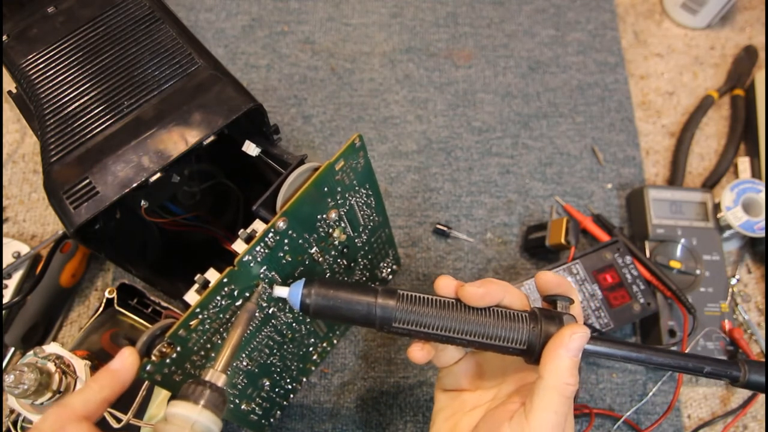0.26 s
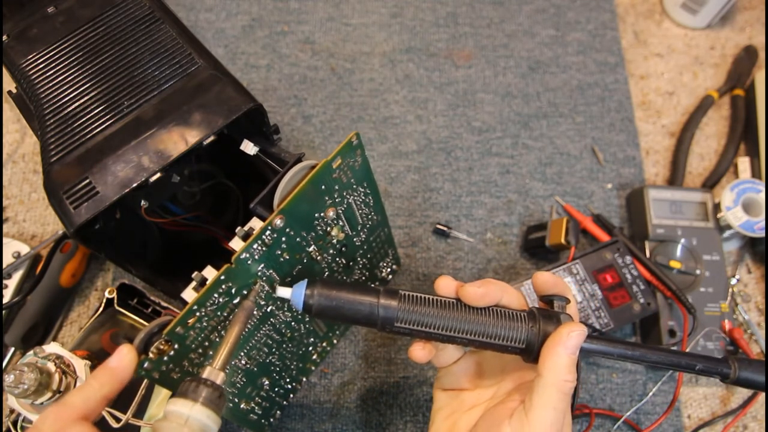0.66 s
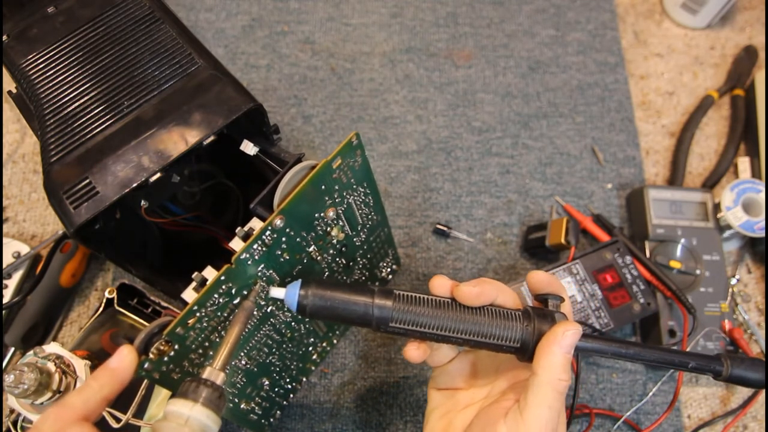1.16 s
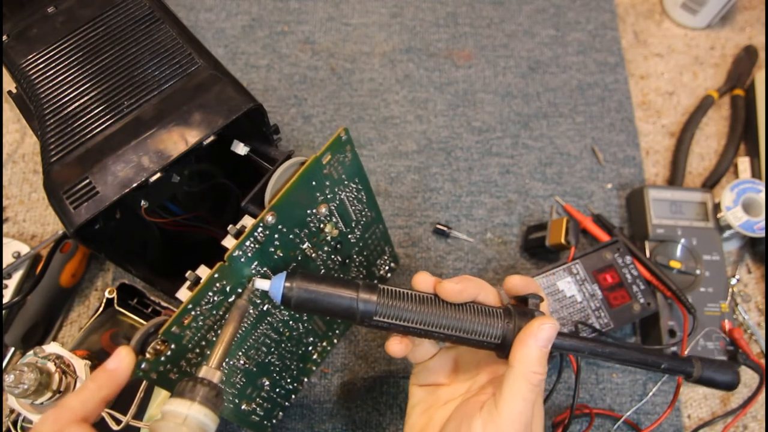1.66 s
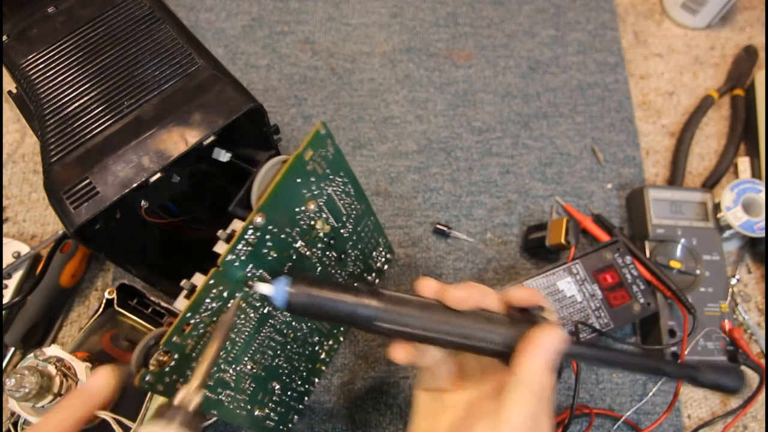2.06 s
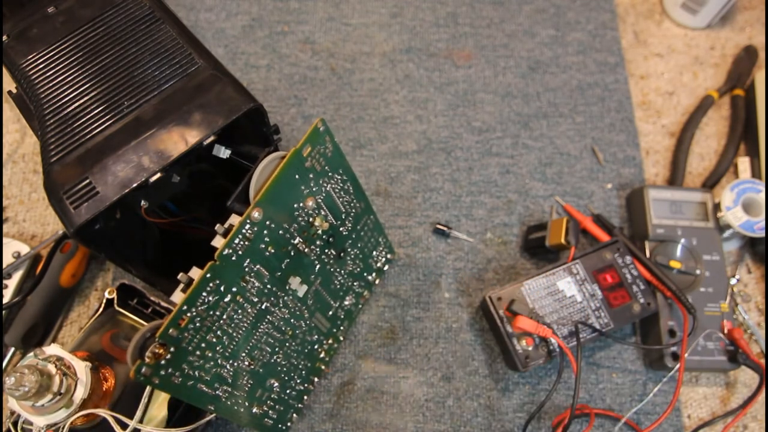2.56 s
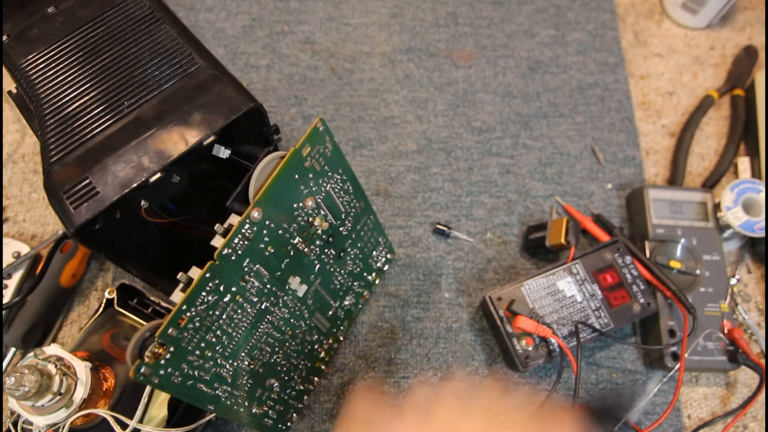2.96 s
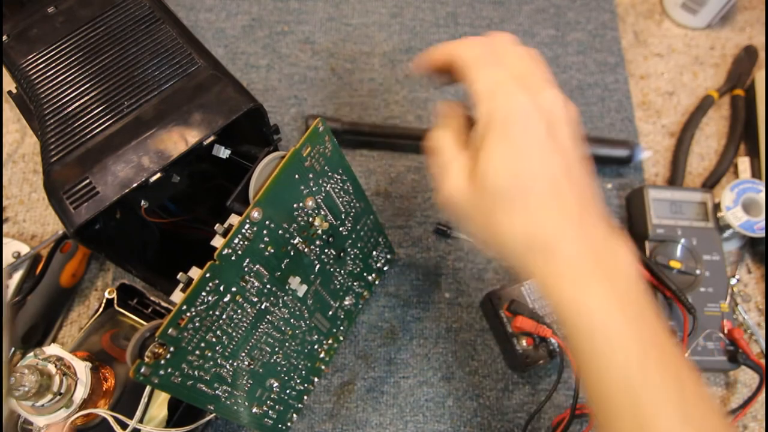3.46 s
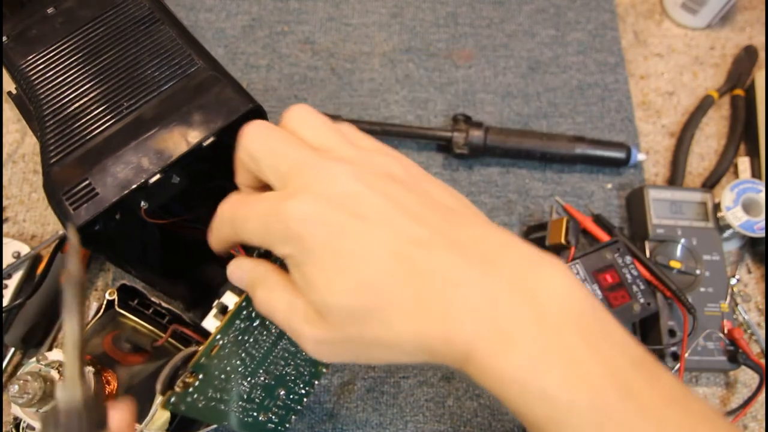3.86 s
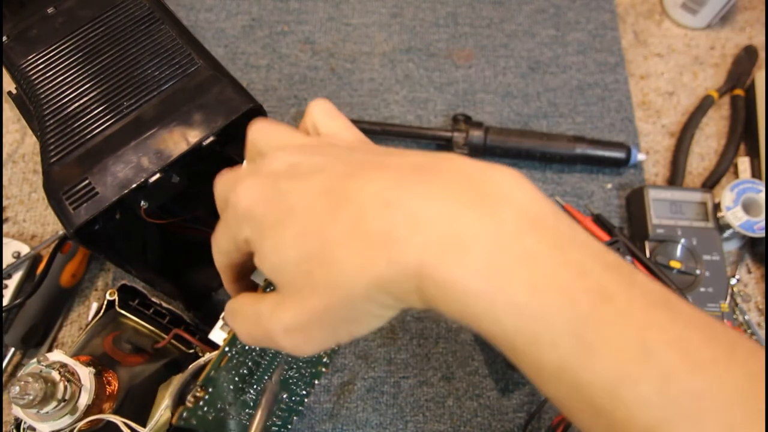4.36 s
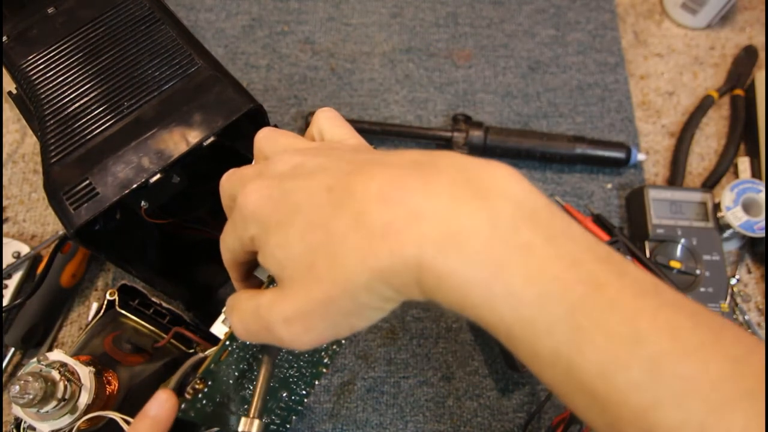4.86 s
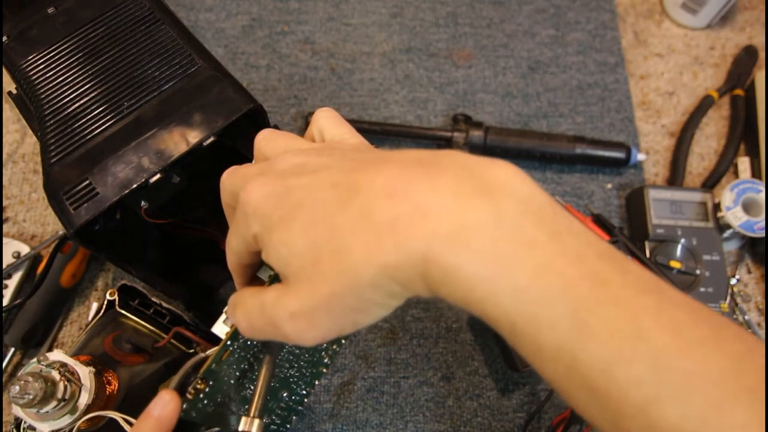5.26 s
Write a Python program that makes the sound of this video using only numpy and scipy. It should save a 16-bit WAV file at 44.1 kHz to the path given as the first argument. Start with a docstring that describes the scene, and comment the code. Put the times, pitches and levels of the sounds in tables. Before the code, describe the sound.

In a small, fairly dry room with steady low room tone and faint hiss, a solder sucker puffs air, snaps sharply, then is cocked with several loud clacks. It is laid down with a dull double thud on a carpeted bench; fingers rap plastic, scuff a circuit board and make it rattle lightly. Close microphone, nearly mono.

```python
"""A solder sucker works on a circuit board in a small room, over steady room tone and microphone hiss.
First come air puffs, as shaped turbulent noise with faint rustle; then the plunger snaps and is cocked again, as
pings, noise bursts and damped notes. The tool is laid on a carpeted bench: soft forces excite its modes and it sways.
Fingers scuff an edge and rap a hollow case; small metal parts chink as narrow noise bands. A hand grips the
board, whose modes rattle under uneven rubbing; faint chinks come last. A diffuse tail follows every close sound."""
import sys
import numpy as np
from scipy import signal
from scipy.fft import rfft, irfft
from scipy.io import wavfile

SR = 44100
rng = np.random.default_rng(int(sys.argv[2]) if len(sys.argv) > 2 else 0)


def generate_wav(sig):
    """Save sig (samples, or channels by samples) to the path in sys.argv[1] as 16-bit PCM at SR."""
    pcm = np.round(np.clip(np.atleast_2d(sig).T, -1, 1) * 32767).astype(np.int16)
    wavfile.write(sys.argv[1], SR, pcm)


N = 243162

# Spectrum of room tone and microphone hiss: [f/Hz, relative density level/dB]
HUSH_SPECTRUM = [(12, -49), (20, -8), (92, -0.5), (199, -3), (223, -2), (555, -11.5), (656, -12),
                 (753, -14.5), (1730, -18.5), (2770, -20.5), (3180, -23), (15000, -28)]
# Spectrum of the hiss that is opposite in the two channels: [f/Hz, relative density level/dB]
SIDE_SPECTRUM = [(12, -30), (20, -1), (80, -3), (155, -8), (367, -6), (1830, -13), (15000, -8.5)]
HUSH_DB, SIDE_HISS_DB = -46, -62.5   # rms levels
# Reverberation time of the room: [f/Hz, t60/s]
ROOM_DECAY = [(300, 0.46), (2000, 0.36), (5500, 0.28), (14000, 0.26)]
ROOM_DB, CUTOFF_HZ = -11, 15900   # tail level; upper limit of the recorded band

# Faint rustle of sleeves and fingers, a continuous level curve: [t/s, level/dB]
RUSTLE_CURVE = [(1.1, -61.5), (1.9, -54), (2.3, -52.5), (2.66, -54), (2.72, -45), (2.83, -44.5),
                (3.0, -48.5), (3.4, -48.5), (4.3, -51), (4.65, -62.5), (5.5, -57.5)]

# Sway of the bench after hard blows: [t/s, level/dB, t60/s]
BENCH_JOLTS = [(1.9, -39.5, 0.53), (2.85, -47, 0.25), (3.44, -27, 0.22), (3.5, -39.5, 1.9)]
JOLT_RISE_S, SWAY_DB = 0.016, -62.5   # SWAY_DB: the sway that is always present
# The tool meets the bench: [t/s, level/dB, reciprocal of contact time f/Hz]
BENCH_KNOCKS = [(3.364, -24.5, 190), (3.442, -15.5, 600), (3.45, -5.5, 534), (3.463, -16, 251),
                (3.491, -20, 259), (3.552, -32, 500), (3.563, -8, 174), (3.595, -20, 197),
                (3.644, -12, 109), (3.675, -26, 152)]
# Modes of the bench top: [f/Hz, relative level/dB, t60/s]
BENCH_MODES = [(103.4, 8.5, 0.039), (138, 5, 0.072), (200, -11, 0.4), (218, -18, 0.11), (321, 3.5, 0.047),
               (452, -10.5, 0.16), (583, -3, 0.071)]

# Fingers rap a hollow case: [t/s, level/dB]
CASE_RAPS = [(3.722, -18), (3.741, -24)]
# Modes of the case: [f/Hz, relative level/dB, t60/s]
CASE_MODES = [(602, 4.5, 0.049), (750, -6.5, 0.074), (990, -13, 0.028), (1435, -15, 0.071)]

# Fingertips scuff the board's edge: [t/s, level/dB, f/Hz, rise/s, t60/s]
EDGE_SCUFFS = [(3.02, -52, 1290, 0.031, 1.7), (3.64, -43, 1060, 0.026, 0.3), (3.739, -36, 1450, .004, 0.14),
               (3.796, -46.5, 1870, .004, 0.21), (3.995, -43, 990, .002, 0.37),
               (4.095, -42, 1780, 0.011, 0.11), (4.179, -40.5, 1870, .001, 0.43),
               (4.273, -39, 3260, 0.00092, 0.06), (4.464, -36.5, 2260, 0.0018, 0.025),
               (4.852, -36, 1320, 0.0032, 0.11), (4.865, -43, 2320, 0.014, 0.12)]
SCUFF_WIDTH, SCRATCH_DB = 0.44, -2   # width as a share of f; broad scratch relative to the scuff
# Small metal parts are brushed: [t/s, level/dB, t60/s, tilt/dB per octave]
METAL_CHINKS = [(3.558, -27, .1, 4), (3.602, -39, 0.096, 6), (3.66, -52, 0.59, 0), (3.724, -44, 0.089, -11),
                (3.82, -49, 0.49, 0), (3.889, -41, 0.058, -6), (4.042, -47, 0.14, -11),
                (4.078, -29.5, 0.077, -8), (4.179, -47.5, 0.13, -6), (4.234, -36, 0.13, -6),
                (4.274, -43, .05, 11), (4.376, -39.5, 0.18, 12), (4.605, -48, 0.13, -3),
                (5.438, -52, 0.12, 2)]
# Resonances of the metal parts: [f/Hz, width/Hz, relative level/dB]
METAL_BANDS = [(4570, 460, -2.5), (5370, 420, -1.5), (7630, 220, -9.5), (8750, 2700, -8)]
# Rise = CHINK_RISE_S + BRUSH_RISE_PER_S * t60^2: a long brush also rises more slowly
CHINK_SCRATCH_DB, CHINK_RISE_S, BRUSH_RISE_PER_S = -12, 0.0016, 0.055

# The board is gripped, rocked and scraped: [t/s, relative level/dB, t60/s, hardness as tilt/dB per octave]
BOARD_TOUCHES = [(2.137, -48, 0.094, 1.5), (3.82, -46.5, 0.2, -1), (3.868, -28.5, 0.086, 3),
                 (3.878, -36, 0.075, -1), (3.89, -34.5, 0.17, 7.5), (3.9, -46.5, 0.22, -5),
                 (3.997, -44.5, 0.026, -4), (4.083, -47, 0.23, -3.5), (4.18, -54, 0.53, 0),
                 (4.297, -29, 0.11, 0), (4.322, -45, 0.14, -0.5), (4.377, -45, 0.072, 9.5),
                 (4.4, -44.5, 0.051, 6), (4.415, -50.5, 0.14, 9), (4.477, -41, 0.13, 1.5),
                 (4.489, -40, 0.1, -4.5), (4.622, -38, 0.13, 3.2), (4.632, -41, 0.29, 1.2),
                 (4.847, -39.5, 0.18, 5.5), (4.864, -35.5, 0.16, 0.5)]
# Modes of the board: [f/Hz, relative level/dB, t60/s]
BOARD_MODES = [(463, -12, 0.57), (578, -2.5, 0.12), (592.9, -3.5, 0.26), (704, -6.5, 0.053),
               (816, -13, 0.12), (900, -16, 0.033), (1040, -3, 0.035), (1213, -3, 0.15), (1524, 5.5, 0.011),
               (1930, -2, 0.014), (2177, -8, 0.044), (2374, -2, 0.012), (3034, -1.5, 0.0056),
               (3440, -30, .012)]
# Grit relative to the touch (dB), its growth (dB per dB/octave of tilt), rise as a share of t60
GRIT_DB, GRIT_PER_TILT, RISE_SHARE = -2.5, 1.5, 0.043

# Dull single-note thumps of barrel and hand: [t/s, level/dB, f/Hz]
DULL_THUMPS = [(1.904, -22, 214), (1.91, -46, 90), (1.916, -17, 560), (1.923, -18.5, 242),
               (2.029, -28, 464), (2.04, -32, 700), (2.632, -31, 144), (2.655, -17, 584), (2.741, -19, 390),
               (2.841, -25, 350), (2.862, -19.5, 293), (2.862, -15, 1454)]
THUMP_T60_S, THUMP_T60_S_PER_KHZ = 0.016, 0.0083   # higher notes are damped less

# Hard clicks of plastic and metal: [t/s, relative ping level/dB, ping f/Hz, crack level/dB, spit level/dB]
HARD_CLICKS = [(1.527, -40, 5250, -57, -53), (1.902, -11, 5040, -24.5, -17), (1.9052, 3.5, 5870, -8.5, -16),
               (1.9128, -9, 4620, -32, -14), (2.1315, -32, 5460, -37, -37.5), (2.1377, -43, 5740, -48, -47),
               (2.4524, -43, 5230, -49, -41.5), (2.6349, 5, 4690, -16.5, -35), (2.6546, -9, 5070, -15, -36),
               (2.7295, 0.5, 6300, -6.5, -7.5), (2.8534, -14.5, 4700, -38, -42),
               (2.863, -2.5, 6050, -21, -14), (2.9303, -5, 5660, -37, -31), (2.9796, -1.5, 6020, -11, -31),
               (3.1838, -32.5, 5300, -47, -39), (3.4559, -8, 6900, -48, -21),
               (3.5604, -19.5, 5470, -41, -20.5), (3.721, -29.5, 5200, -31, -43),
               (3.8698, -14, 5340, -19, -56), (3.8914, -9.5, 5770, -15.5, -41),
               (4.2961, -19, 3770, -44, -41), (4.3024, -35, 3330, -22, -37), (4.377, -19.5, 2900, -37, -27),
               (4.3984, -25, 3820, -36, -36), (4.4208, -25, 4660, -37, -40)]
CLICK_T60_S, T60_LOSS_S_PER_DB = 0.019, .0005   # t60 at 0 dB; harder clicks are drier
CRACK_HZ, CRACK_HZ_PER_DB = 2550, 26   # at 0 dB; harder clicks crack higher
CRACK_LIFE = 0.83   # t60 of the crack as a share of the click's

# Spectrum of the turbulent air: [f/Hz, relative density level/dB]
AIR_SPECTRUM = [(200, -22), (330, -5.5), (500, -7), (1100, -4.5), (2400, -10), (3100, -6), (3700, -7),
                (5300, -1.5), (6300, -3.5), (7500, -7.5), (10500, -6), (13000, -13.5), (16000, -22)]
# Puffs of air and sliding plunger: [t/s, level/dB, rise/s, t60/s, breadth (outer bands against middle)/dB]
AIR_PUFFS = [(0.931, -17.5, 0.015, 0.26, -5.5), (1.33, -46, 0.035, 0.73, -5.5), (1.4, -50, 0.011, 0.19, -8),
             (1.671, -27.5, 0.019, 0.35, -5), (1.898, -22.5, 0.0035, 0.27, 3),
             (2.139, -38, 0.016, 0.58, -6), (2.3, -47.5, 0.014, 0.89, -5), (2.631, -21.5, 0.0033, 0.4, -5),
             (2.691, -27, 0.036, 0.053, -5), (2.728, -18, 0.0019, 0.11, -12),
             (2.86, -23, 0.0014, 0.16, -2.5), (2.884, -18.5, 0.053, 0.27, -11),
             (2.94, -20.5, 0.036, 0.12, -16), (2.977, -25.5, 0.002, 0.1, 8.5),
             (3.442, -30, 0.011, 0.24, 4.5), (3.887, -26, 0.0016, 0.2, -3.5)]
# Offsets from the breadth; treble t60 as a share of the puff's
PUFF_TREBLE_DB, PUFF_BASS_DB, TREBLE_LIFE = 0.5, -2, 0.63


def from_db(db):
    """Level definition: 20 dB per factor of ten in amplitude."""
    return 10 ** (np.asarray(db) / 20)


def rms_one(x):
    """Normalisation to unit root-mean-square amplitude."""
    return x / np.sqrt(np.mean(x ** 2) + 1e-20)


def at_hz(points, hz):
    """Interpolation along a logarithmic frequency axis."""
    f, value = np.transpose(points)
    return np.interp(np.log(hz), np.log(f), value)


def coloured(spectrum):
    """Spectral shaping: white noise weighted in the frequency domain, rms 1."""
    hz = np.maximum(np.arange(N // 2 + 1) * SR / N, 1)
    white_spectrum = rfft(rng.standard_normal(N))
    return rms_one(irfft(white_spectrum * from_db(at_hz(spectrum, hz)), N))


def band(x, low_hz, high_hz):
    """Band-pass filtering by a Butterworth response."""
    edges = [low_hz, min(high_hz, .45 * SR)]
    return signal.sosfilt(signal.butter(2, edges, "band", fs=SR, output="sos"), x)


def ring(x, hz, t60):
    """Damped resonance: a unit impulse sets a decaying sine of initial height 1 ringing."""
    radius, angle = from_db(-60 / (max(t60, .002) * SR)), 2 * np.pi * hz / SR
    feedback = [1, -2 * radius * np.cos(angle), radius ** 2]
    return signal.lfilter([0, np.sin(angle)], feedback, x + 1e-18)


def swell(rise, t60, size):
    """Transient envelope: smooth rise to 1, then exponential decay."""
    t, rise = np.arange(size) / SR, max(rise, 2e-4)
    onset = np.sin(np.pi / 2 * np.minimum(t / rise, 1)) ** 2
    return onset * from_db(-60 * np.maximum(t - rise, 0) / max(t60, .003))


def add(out, s, piece):
    """Superposition of a piece starting at s seconds."""
    i = round(s * SR)
    out[i:i + len(piece)] += piece[:N - i]


def sputter(depth_db, hz):
    """Random amplitude modulation of a flow or rub, with rms depth in dB and rates of hz / 4 to hz."""
    return from_db(depth_db * rms_one(band(rng.standard_normal(N), hz / 4, hz)))


def burst(white, s, low_hz, high_hz, rise, t60):
    """Transient excitation: noise under a swell, then filtered, so that narrow bands ring on."""
    size = round(SR * (.05 + rise + min(t60, 1)))
    x = white[round(s * SR):][:size] * swell(rise, t60, size=size)
    filtered = band(band(x, low_hz, high_hz), low_hz, high_hz)
    return filtered * np.sqrt(.6 * SR / (high_hz - low_hz))   # offsets the loss of power in a narrow band


def damped_note(s, level_db, hz, t60, out):
    """Modal response: one decaying sine, started by a contact shorter than a cycle."""
    t = np.arange(SR // 3) / SR
    add(out, s, from_db(level_db) * np.sin(2 * np.pi * hz * t) * swell(0.46 / hz, t60, size=len(t)))


def hush():
    """Stationary noise: the steady room tone and microphone hiss."""
    return from_db(HUSH_DB) * coloured(HUSH_SPECTRUM)


def side_hiss():
    """Antiphase noise: one hiss of opposite sign in the two channels."""
    return from_db(SIDE_HISS_DB) * coloured(SIDE_SPECTRUM) * [[1], [-1]]


def room(x):
    """Diffuse reverberation: convolution with octave bands of noise, each dying at its own rate."""
    t, white = np.arange(SR // 2) / SR, rng.standard_normal(SR // 2)
    tail = np.zeros(len(t))
    for hz in 280 * 2. ** np.arange(6):
        tail += band(white, hz, 2 * hz) * from_db(-60 * t / at_hz(ROOM_DECAY, hz * 1.4))
    tail *= np.minimum(t / 0.0021, 1) ** 2   # the tail builds up over 2.1 ms
    return signal.fftconvolve(x, tail / np.sqrt(np.sum(tail ** 2)))[:N]


def rustle():
    """Friction noise: an uneven band of noise follows a slow level curve."""
    gain = from_db(np.interp(np.arange(N) / SR, *np.transpose(RUSTLE_CURVE)))
    noise = rms_one(band(coloured(AIR_SPECTRUM), 1100, 6500))
    return gain * noise * sputter(depth_db=2.0, hz=25.4)


def bench_sway():
    """Low-frequency vibration: a faint constant rumble swells after hard blows."""
    gain = np.full(N, from_db(SWAY_DB))
    for s, level_db, t60 in BENCH_JOLTS:
        add(gain, s, from_db(level_db) * swell(JOLT_RISE_S, t60, size=2 * SR))
    rumble = band(band(rng.standard_normal(N), 27, 104), 27, 108)
    return gain * rms_one(rumble)


def bench_knocks():
    """Modal excitation: soft contacts, cushioned by the carpet, strike the bench top's modes."""
    force, knocks = np.zeros(N), np.zeros(N)
    for s, level_db, contact_hz in BENCH_KNOCKS:
        push = np.hanning(round(SR / contact_hz))   # a longer contact drives only the lowest modes
        add(force, s, from_db(level_db) * push / push.sum())
    for k, (hz, level_db, t60) in enumerate(BENCH_MODES):
        knocks += (-1) ** k * from_db(level_db) * ring(force, hz, t60)   # neighbours differ in sign
    return band(knocks, 128, 1000)


def case_raps():
    """Modal superposition: a rap on the hollow case sounds all its modes at once."""
    out = np.zeros(N)
    for s, rap_db in CASE_RAPS:
        for hz, level_db, t60 in CASE_MODES:
            damped_note(s, rap_db + level_db, hz, t60, out)
    return out


def scuffs():
    """Friction through resonance: uneven rubbing in a narrow band, with a broad scratch around it."""
    white, out = rng.standard_normal(N + 2 * SR), np.zeros(N)
    white[:N] *= sputter(depth_db=2.5, hz=122)
    for s, level_db, hz, rise, t60 in EDGE_SCUFFS:
        low_hz, high_hz = hz * (1 - SCUFF_WIDTH / 2), hz * (1 + SCUFF_WIDTH / 2)
        add(out, s, from_db(level_db) * burst(white, s, low_hz, high_hz, rise, t60))
        # the scratch takes another stretch of the noise
        scratch = burst(white, s + .5, hz / 3.0, hz * 1.48, rise, t60)
        add(out, s, from_db(level_db + SCRATCH_DB) * scratch)
    return out


def chinks():
    """Resonant filtering: brushed metal parts sound as narrow noise bands over a weak broad scratch."""
    white, out = rng.standard_normal(N + 2 * SR), np.zeros(N)
    white[:N] *= sputter(depth_db=2.5, hz=122)
    for s, level_db, t60, tilt_db in METAL_CHINKS:
        rise = CHINK_RISE_S + BRUSH_RISE_PER_S * t60 ** 2
        for hz, width_hz, part_db in METAL_BANDS:
            gain = from_db(level_db + part_db + tilt_db * np.log2(hz / 5000))
            add(out, s, gain * burst(white, s, hz - width_hz / 2, hz + width_hz / 2, rise, t60))
        scratch = burst(white, s + .5, 2600, 12000, rise, t60)
        add(out, s, from_db(level_db + CHINK_SCRATCH_DB) * scratch)
    return out


def board():
    """Forced modes: an uneven rub drives the board; hard touches favour high modes and grit, soft ones low modes."""
    rub, out = rng.standard_normal(N + 2 * SR), np.zeros(N)
    rub[:N] *= sputter(depth_db=1.5, hz=504)   # grain
    shape = (len(BOARD_TOUCHES), len(BOARD_MODES))
    detune = rng.normal(1, .012, shape)   # the grip shifts every mode a little
    spread_db = rng.normal(0, 2, shape)
    for (s, touch_db, t60, tilt_db), shifts, spreads in zip(BOARD_TOUCHES, detune, spread_db):
        rise = RISE_SHARE * t60
        force = rub[round(s * SR):][:SR // 2] * swell(rise, t60, size=SR // 2) * from_db(touch_db - 18)
        for (hz, level_db, ring_t60), shift, extra_db in zip(BOARD_MODES, shifts, spreads):
            gain = from_db(level_db + tilt_db * np.log2(hz / 1000) + extra_db)
            add(out, s, gain * ring(force, hz * shift, ring_t60))
        grit_db = touch_db + GRIT_DB + GRIT_PER_TILT * tilt_db
        add(out, s, from_db(grit_db) * burst(rub, s, 4130, 6330, rise, t60))
        add(out, s, from_db(grit_db - 9.0) * burst(rub, s, 7200, 11700, rise, t60))
    return band(out, 430, 9500)


def thumps():
    """Impulsive excitation: barrel and hand each sound a single damped note."""
    out = np.zeros(N)
    for s, level_db, hz in DULL_THUMPS:
        damped_note(s, level_db, hz, THUMP_T60_S + THUMP_T60_S_PER_KHZ * hz / 1000, out)
    return out


def clicks():
    """Impact: a struck part pings amid rattling contact, with a lower crack and a bright spit that dies first."""
    white, out, t = rng.standard_normal(N + 2 * SR), np.zeros(N), np.arange(SR // 10) / SR
    for s, level_db, hz, crack_db, spit_db in HARD_CLICKS:
        t60 = CLICK_T60_S - T60_LOSS_S_PER_DB * level_db
        crack_hz = CRACK_HZ + CRACK_HZ_PER_DB * level_db
        start = s - .001   # the rise precedes the tabled time
        ping = np.sin(2 * np.pi * hz * t) * swell(.0005, .7 * t60, size=len(t))
        rattle = burst(white, s, hz / 1.4, hz * 1.304, 0.00012, t60)
        crack = burst(white, s, crack_hz / 1.82, crack_hz * 1.52, 0.00073, CRACK_LIFE * t60)
        spit = burst(white, s, 7300, 13500, .0004, .6 * t60)
        add(out, start, from_db(level_db - 6) * ping)
        add(out, start, from_db(level_db - 6.5) * rattle)
        add(out, start, from_db(crack_db) * crack)
        add(out, start, from_db(spit_db) * spit)
    return out


def air():
    """Turbulence: puffs shape one hiss, broad or narrow about its middle band; the treble fades first."""
    hiss, out = coloured(AIR_SPECTRUM) * sputter(depth_db=1.0, hz=420), np.zeros(N)
    # alternate signs keep neighbouring bands from cancelling where they meet
    bass, middle, treble = -band(hiss, 200, 2700), band(hiss, 2700, 7500), -band(hiss, 7500, 19000)
    for s, level_db, rise, t60, breadth_db in AIR_PUFFS:
        i = round(s * SR)
        body = (middle + from_db(breadth_db + PUFF_BASS_DB) * bass)[i:i + SR]
        top = from_db(breadth_db + PUFF_TREBLE_DB) * treble[i:i + SR]
        add(out, s, from_db(level_db) * body * swell(rise, t60, size=len(body)))
        add(out, s, from_db(level_db) * top * swell(rise, TREBLE_LIFE * t60, size=len(top)))
    return out


def scene():
    """Superposition: direct sound, its diffuse tail and steady hush, common to both channels, plus side hiss."""
    near = rustle() + bench_sway() + bench_knocks() + case_raps() + scuffs() + chinks()
    near += board() + thumps() + clicks() + air()
    mono = near + from_db(ROOM_DB) * room(near) + hush()
    return mono + side_hiss()


def record(dry):
    """Limiting and band limitation: peaks are clipped at full scale, then a steep low-pass cuts the top."""
    limited = np.clip(dry, -1, 1)
    return signal.sosfilt(signal.ellip(14, .3, 85, CUTOFF_HZ, fs=SR, output="sos"), limited)


dry = scene()
out = record(dry)
generate_wav(out)
```